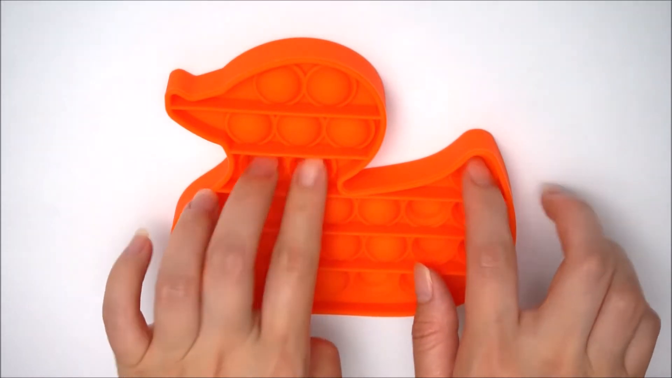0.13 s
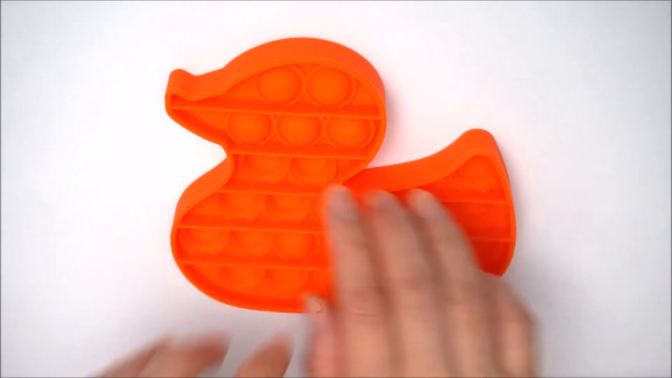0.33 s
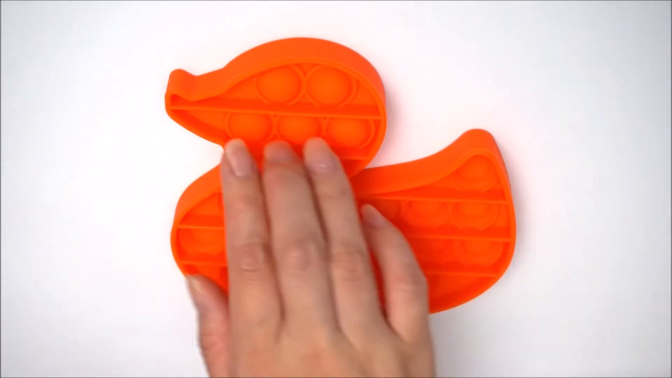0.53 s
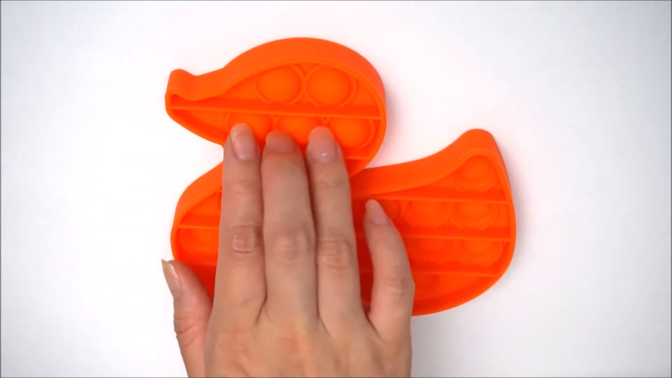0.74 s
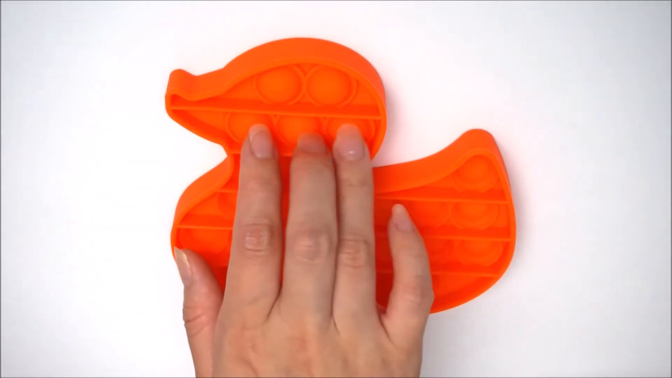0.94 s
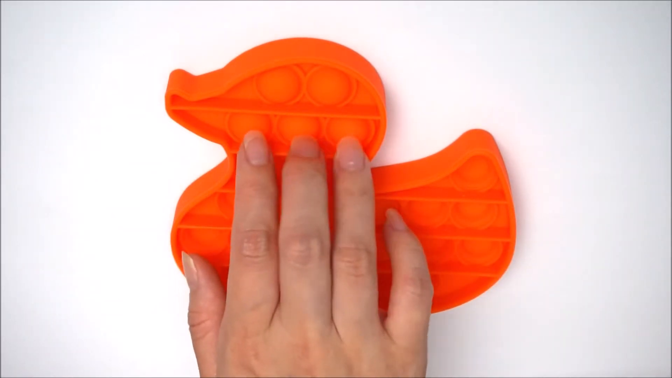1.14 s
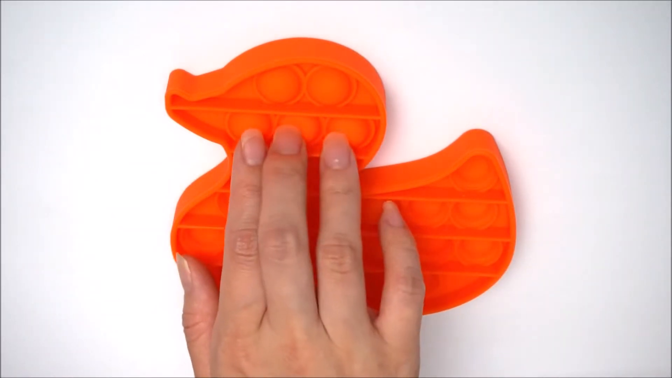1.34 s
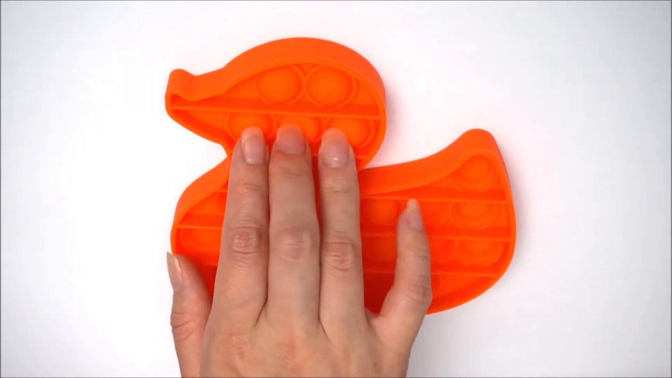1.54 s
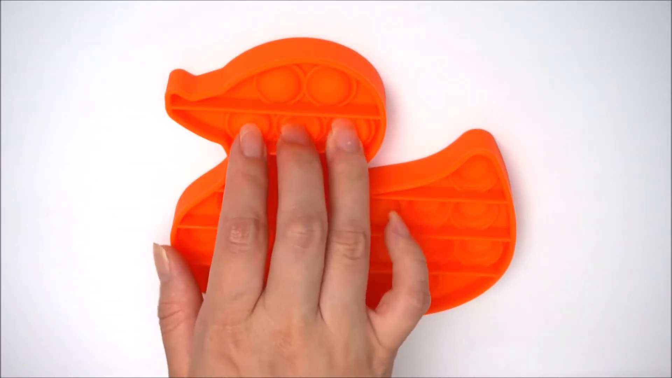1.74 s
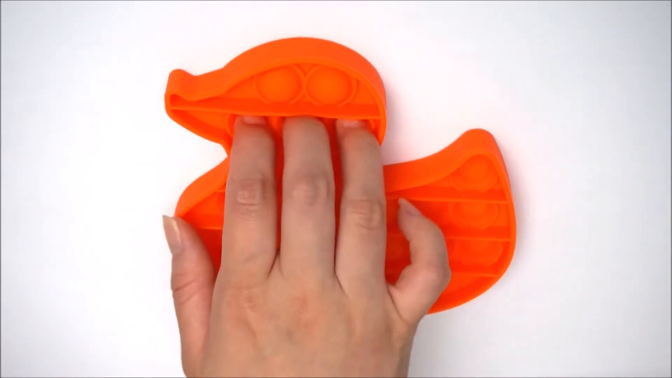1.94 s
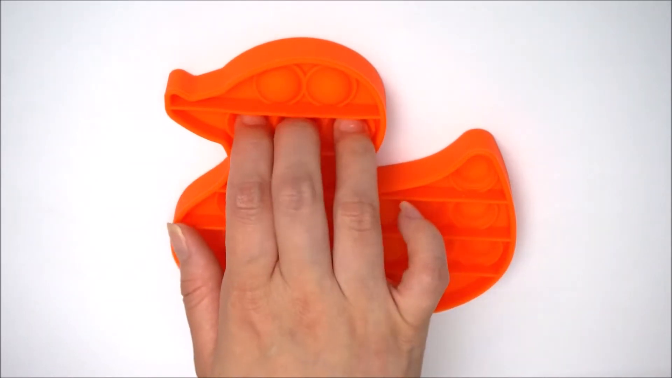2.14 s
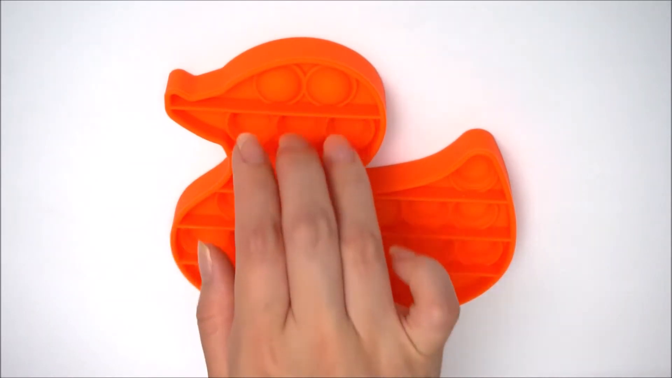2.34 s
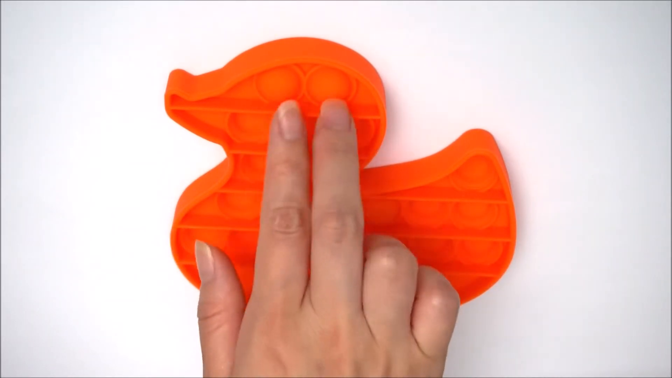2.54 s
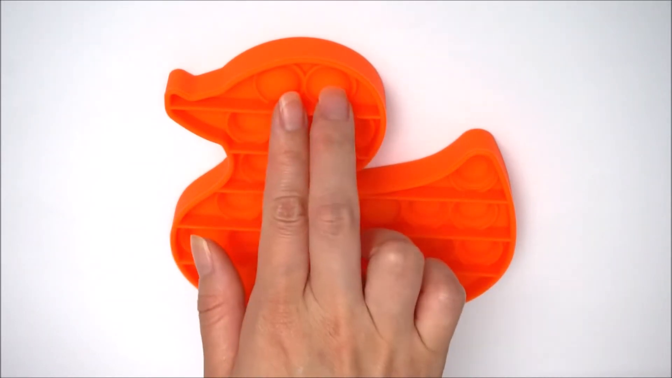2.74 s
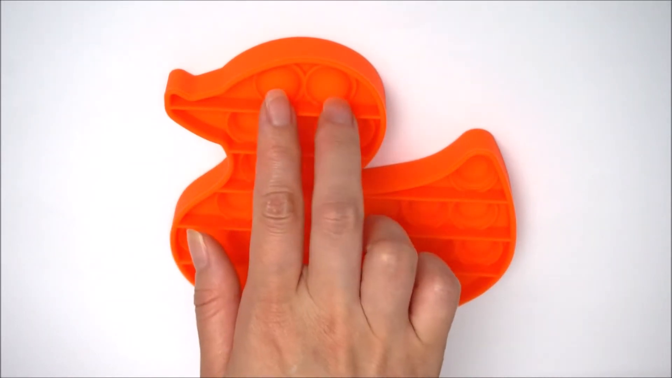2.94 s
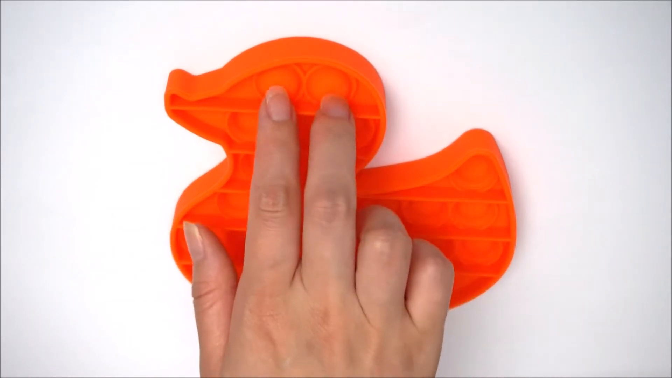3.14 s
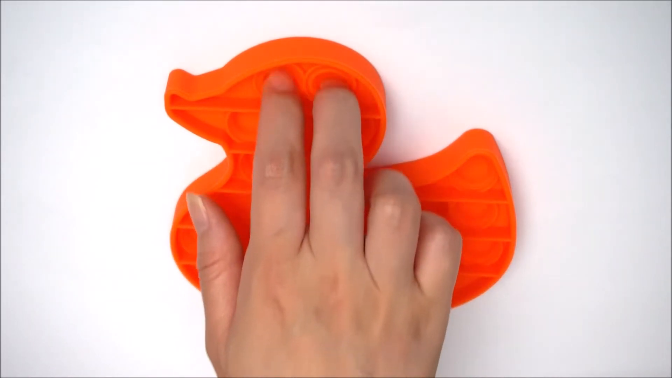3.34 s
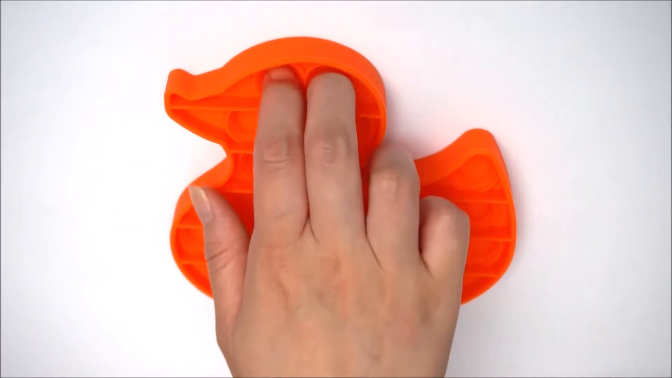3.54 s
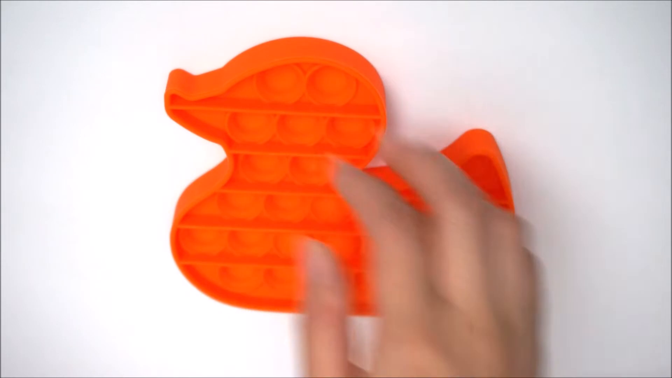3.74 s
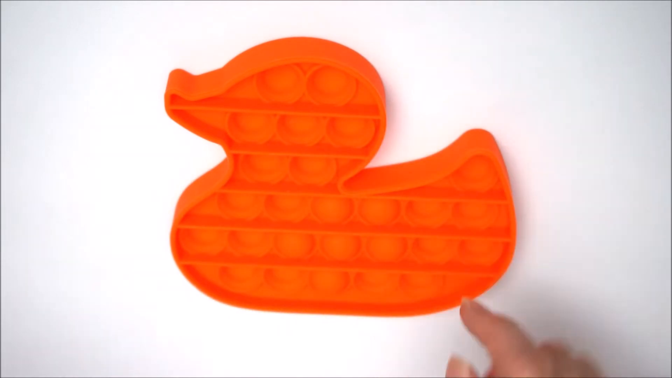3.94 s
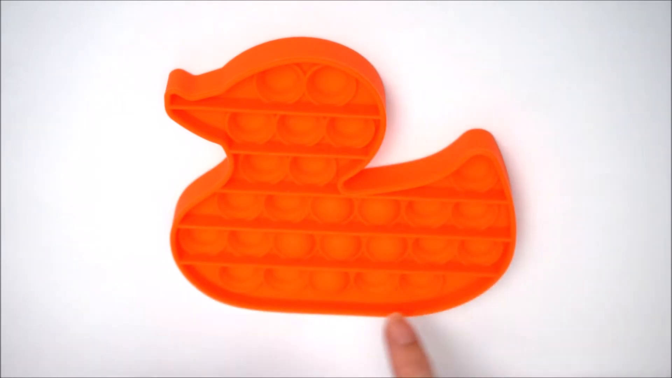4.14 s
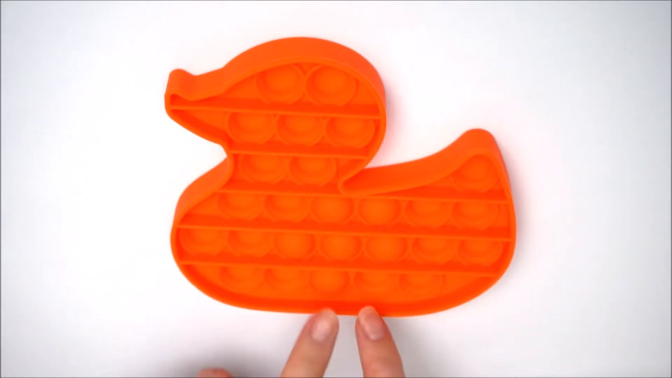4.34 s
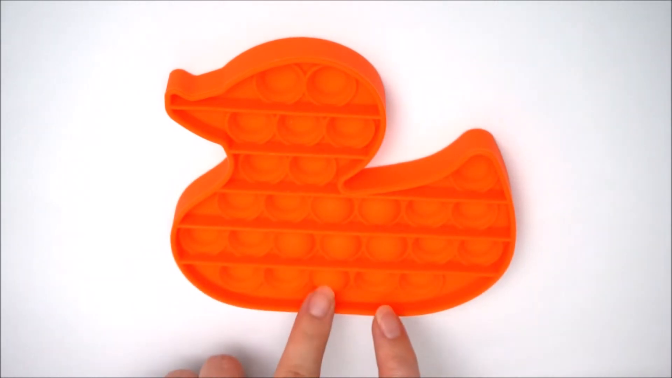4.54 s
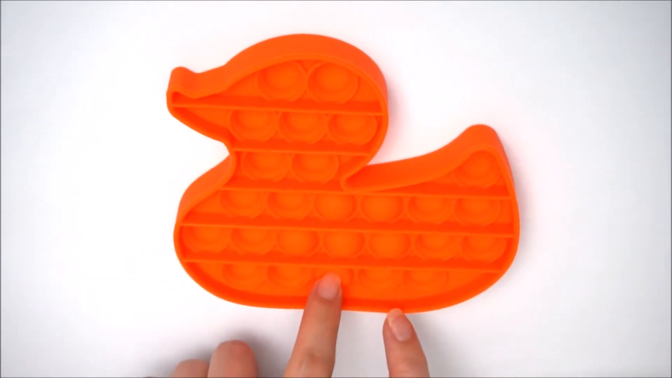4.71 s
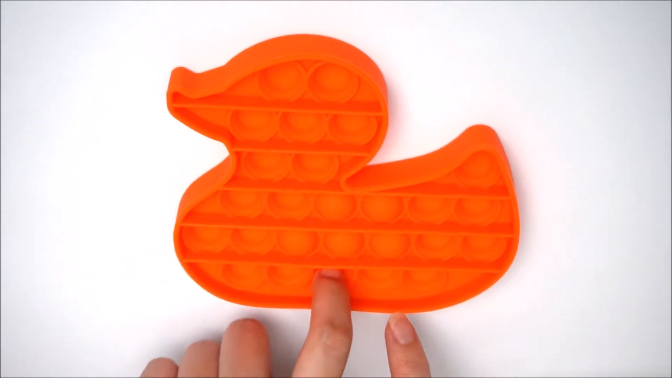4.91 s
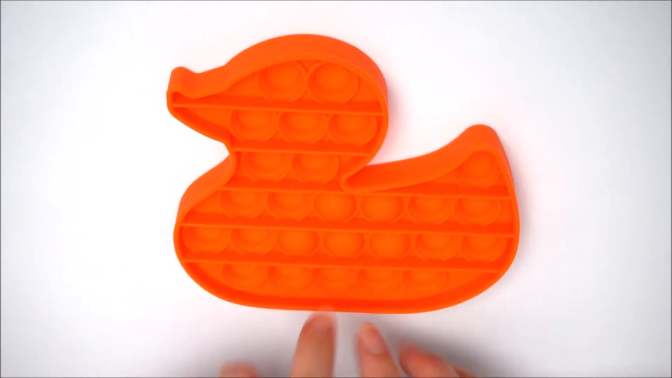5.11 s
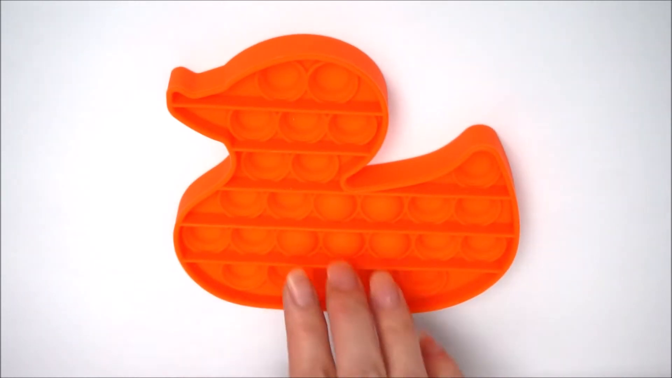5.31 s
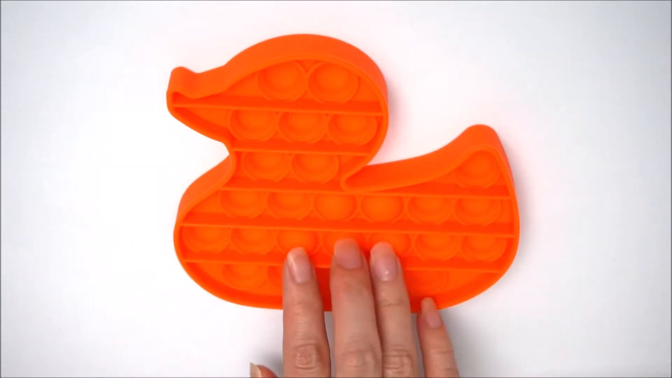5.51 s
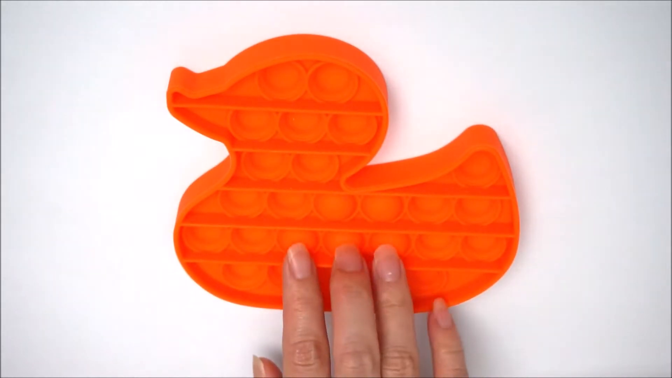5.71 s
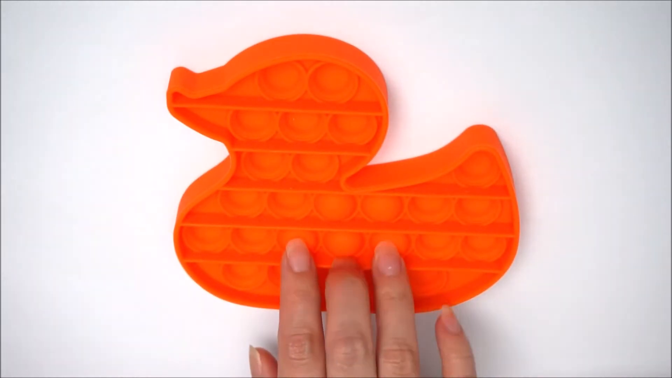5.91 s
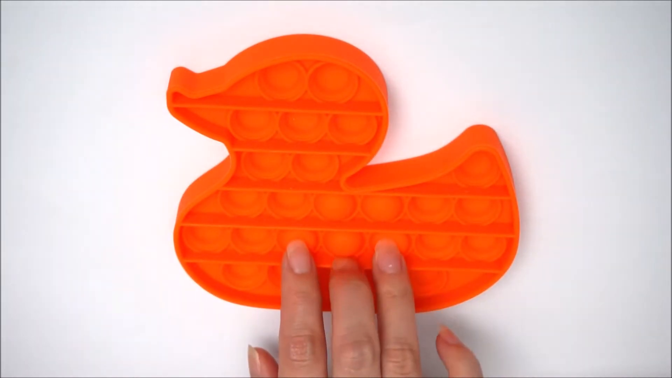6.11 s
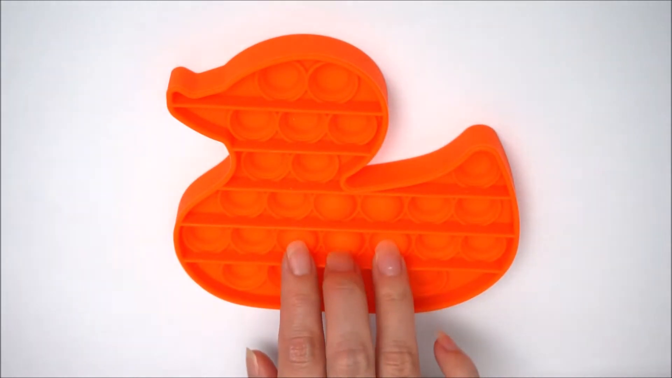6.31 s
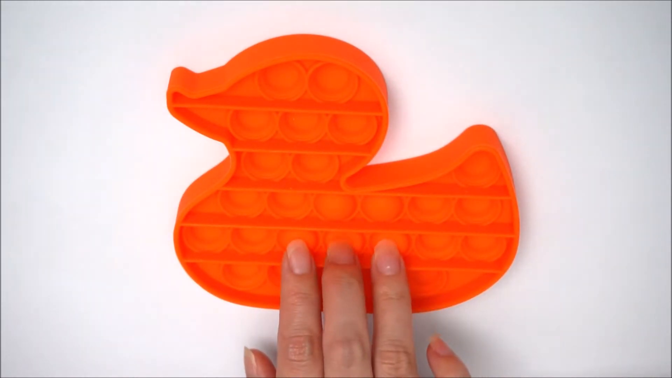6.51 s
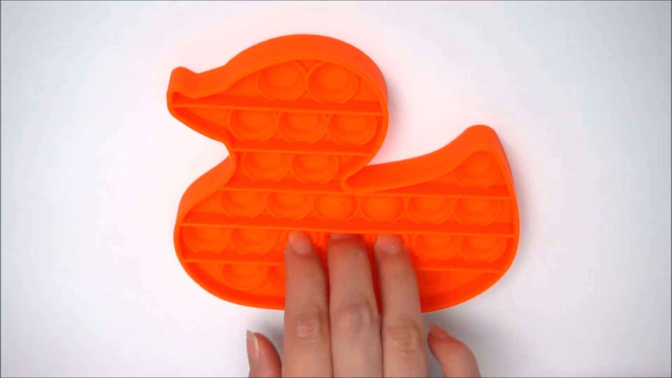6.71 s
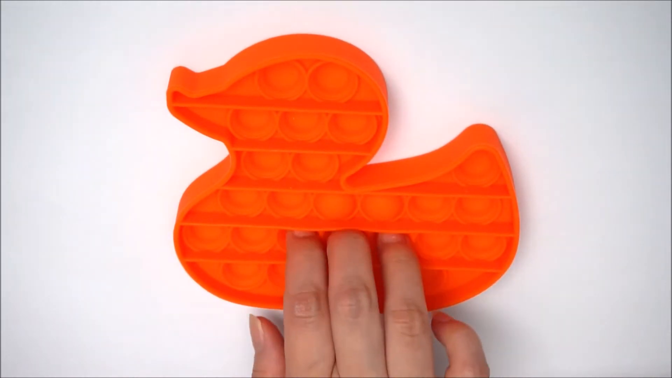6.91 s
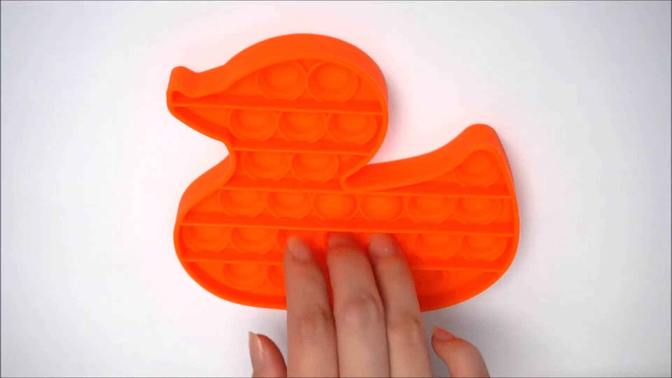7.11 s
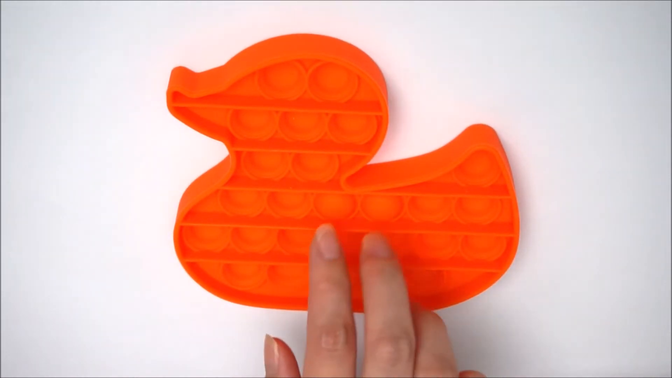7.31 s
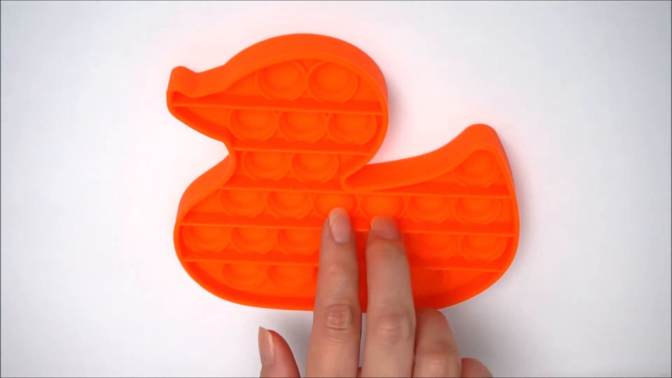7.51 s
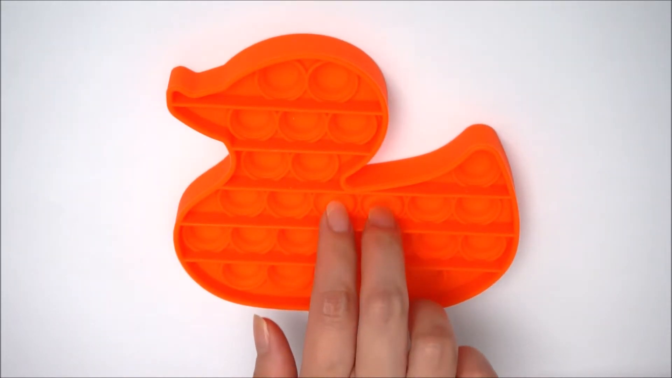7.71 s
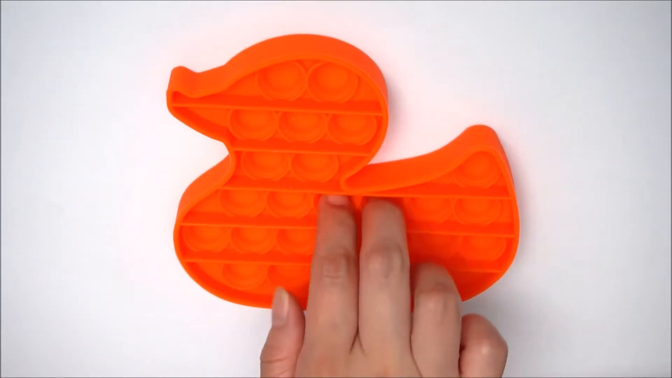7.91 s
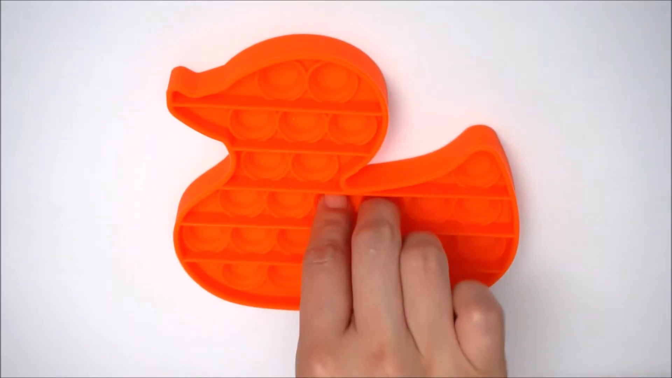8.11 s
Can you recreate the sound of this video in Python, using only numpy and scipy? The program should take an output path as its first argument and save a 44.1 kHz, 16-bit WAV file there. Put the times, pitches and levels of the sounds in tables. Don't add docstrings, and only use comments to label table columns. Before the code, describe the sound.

Clusters of soft rubbery pops from a silicone bubble toy pressed by fingers on a table, over low room hiss and faint skin rustling.

```python
import sys
import numpy as np
from scipy import signal
from scipy.fft import rfft, irfft, next_fast_len
from scipy.io import wavfile
from scipy.ndimage import uniform_filter1d

SR = 44100
rng = np.random.default_rng(int(sys.argv[2]) if len(sys.argv) > 2 else 0)


def level_to_linear(level):
    exponent = np.asarray(level, float) / 20
    return 10 ** exponent


def unload_wav(signal):
    wavfile.write(
        sys.argv[1],
        SR,
        np.round(np.clip(np.atleast_2d(signal).T, -1, 1) * 32767).astype(np.int16),
    )


N = 359415

# start in seconds, blow level in dB, dome pitch in Hz,
# time for the dome to fade by 60 dB in ms, rim level above the dome in dB.
DOME_SNAPS = [(1.8008, -29, 660.0, 12, -13), (1.8382, -16, 710, 16, 12.5), (1.8545, -14.3, 844, 23, -7),
              (1.8821, -8.5, 910, 31, -5), (1.8882, -4.5, 1070, 4.6, -11), (1.8966, -3, 933, 12.2, 2),
              (3.2913, -14, 746, 11.4, -14), (3.3545, -12, 780, 9.1, 3.5), (3.3735, -4, 910, 18.6, 1),
              (3.4138, -6.5, 1025, 18, 4), (4.7401, -20.5, 815, 11, 9.5), (4.7983, -10, 880, 9, 12.5),
              (6.6345, -10, 600, 3.6, 7.5), (6.66, -1.4, 930, 5.1, -11), (6.6945, -19.5, 730.0, 10, 8.5),
              (6.728, -11, 865, 5.4, -1), (6.756, 1.5, 1200, 3.6, -1), (6.7874, 7, 1190, 4.2, -26),
              (7.7885, -8, 920, 6.9, 6.5), (7.8038, -17.5, 810, 12.0, 2), (7.8306, 5.5, 1240, 3.2, -3.5),
              (7.8486, 5.5, 1290, 3.8, -14)]
# start in seconds, click level in dB,
# bright part against the click in dB, cell wall level in dB.
SKIN_SLAPS = [(1.8377, -38, -16, -32), (1.8537, -42, -6.5, -37), (1.881, -44, -6, -35),
              (1.8882, -41, 0, -41), (1.8937, -27.5, -18, -20.5), (3.3523, -42, -10, -28),
              (3.373, -43, -5.5, -22.5), (3.4134, -27.5, -14.5, -21), (4.7394, -46, -7, -29.5),
              (4.7971, -28, -14, -14.5), (6.6336, -48, -5, -19), (6.659, -32, -3.5, -17.5),
              (6.7263, -41, -10, -28), (6.7547, -37, -9, -12), (6.7865, -29, -16, -23),
              (7.788, -36.5, 7.5, -19), (7.8028, -46, -2, -27), (7.83, -24.5, -11.5, -18),
              (7.8478, -22, -17, -26)]


def on_log(points, hz):
    point_hz, value = np.transpose(points)
    return np.interp(np.log(np.maximum(hz, 1)), np.log(point_hz), value)


def curve(s, db):
    return level_to_linear(np.interp(np.arange(N) / SR, s, db, left=-200, right=-200))


def noise(colour):
    # pitch in Hz, left-right correlation from -1 to 1.
    likeness = [(60, 0.98), (150, 0.75), (290, 0.2), (640, -0.018), (1410, -0.33), (3100, 0.099),
                (6820, 0.14), (15000, 0.4)]
    size = next_fast_len(N)
    hz = np.fft.rfftfreq(size, 1 / SR)
    alike = np.clip(on_log(likeness, hz), -.99, .99)
    white = rfft(rng.standard_normal((2, size)))
    mid, side = white * np.sqrt([1 + alike, 1 - alike]) * level_to_linear(on_log(colour, hz))
    out = irfft(np.array([mid + side, mid - side]), size)[:, :N]
    return out / np.std(out)


def walk(rate_hz):
    hold = int(SR / rate_hz)
    steps = np.repeat(rng.standard_normal(N // hold + 1), hold)
    smooth = uniform_filter1d(uniform_filter1d(steps, hold), hold)[:N]
    return smooth / np.std(smooth)


def strokes(rows):
    t = np.arange(N) / SR
    power = np.zeros(N)
    for s, db, rise, fall in rows:
        away = np.where(t < s, (s - t) / rise, (t - s) / fall)
        power += level_to_linear(db - 20 * away) ** 2
    return np.sqrt(power)


def band(x, lo_hz, hi_hz):
    return signal.sosfilt(signal.butter(2, [lo_hz, hi_hz], "band", fs=SR, output="sos"), x)


def ring(t, hz, t60_ms):
    return np.cos(2 * np.pi * hz * t) * np.exp(-np.log(1000) * t / t60_ms * 1000)


def hiss_floor():
    # pitch in Hz, hiss strength in dB per Hz.
    hiss_colour = [(25, -17), (45, -7), (86, -3), (400, -7.5), (1270, -13), (2700, -19.5), (9300, -26),
                   (15500, -27.5)]
    # time in seconds, level in dB.
    swell = [(0.0, -52), (0.43, -59.5), (1.38, -60), (1.84, -55), (2.2, -57), (3.15, -57), (3.49, -52.5),
             (4.381, -54.5), (6.51, -56.5), (6.83, -51.5), (7.08, -57.5), (7.88, -58), (8.15, -57.5)]
    s, db = np.transpose(swell)
    hiss = noise(hiss_colour) * level_to_linear(-50.5)
    low = signal.sosfilt(signal.butter(1, 900, fs=SR, output="sos"), hiss)
    middle_db = -56.5
    swelling = curve(s, 0.58 * (db - middle_db)) * level_to_linear(1.37 * walk(9.9))
    return hiss + low * (swelling - 1)


def knock():
    t = np.arange(N) / SR
    fade_out = np.clip((.14 - t) / 0.037, 0, 1)
    return level_to_linear(-48) * ring(t, hz=355, t60_ms=960) * fade_out


def rumble():
    # loudest moment in seconds, level in dB, rise in seconds, fall in seconds.
    shoves = [
        (1.18, -46, .1, 0.5),
        (1.53, -44, 0.042, .2),
        (1.63, -43.5, .2, 0.18),
        (1.86, -53, .07, .2),
        (1.97, -40, 0.26, 0.16),
        (2.12, -51, .1, 0.062),
        (2.252, -63, .055, .05),
        (2.324, -64, 0.036, .06),
    ]
    rustles = [
        (1.95, -44, 0.098, 0.31),
    ]
    # pitch in Hz, strength in dB per Hz.
    shove_colour = [(18, -42), (30, -6), (129, -0.5), (256, -10), (338, -6), (420, -12), (1500, -25.5),
                    (2100, -70)]
    rustle_colour = [(1200, -8), (2300, -0.5), (3000, 1), (3450, 2.5), (4100, -5.5), (5100, -4), (6200, -7),
                     (12000, -20)]
    low = noise(shove_colour) * strokes(shoves) * level_to_linear(2.2 * walk(45))
    thin = noise(rustle_colour) * strokes(rustles) * level_to_linear(walk(80))
    return low + thin


def slides():
    # loudest moment in seconds, level in dB, rise in seconds, fall in seconds.
    drags = [
        (.658, -64, .23, .1),
        (.822, -64.5, .4, .2),
        (4.084, -53, 0.64, 0.35),
        (4.652, -63, .08, 0.22),
        (5.522, -68, .37, .08),
        (5.62, -74, .1, .3),
    ]
    # pitch in Hz, strength in dB per Hz.
    skin_colour = [(300, -5), (1000, -10), (3000, -4.5), (6000, -4), (10000, -0.5), (14000, -1.5),
                   (17000, -9.5)]
    grain = level_to_linear(.7 * walk(60) + 5)
    lean_right = level_to_linear(np.array([[-1.2], [1.2]]))
    return noise(skin_colour) * strokes(drags) * grain * lean_right


def table():
    blows, t = np.zeros(N), np.arange(SR // 16) / SR
    for s, db, _, t60_ms, _ in DOME_SNAPS:
        blows[int(s * SR)] = level_to_linear(db - 25) * (t60_ms / 12) ** 2.03
    table_hz = 341
    thump = ring(t, table_hz, t60_ms=26) * np.minimum(t * table_hz, 1)
    return signal.fftconvolve(blows, thump)[:N]


def cell(s):
    pressed_from_s = [0, 1.87, 3.0, 3.365, 4.5, 5.5, 6.3, 6.71, 6.745, 7.2, 7.6, 7.818, 7.95]
    # rim pitch in Hz, wall pitch in Hz.
    rim_and_wall_hz = [(1970, 2570), (1530, 2830), (1600, 2820), (1410, 2600), (1440, 2230), (3630, 2400),
                       (1380, 2380), (3080, 2000), (1630, 2490), (2000, 2400), (2350, 1420), (2010, 2600),
                       (1800, 2000)]
    return rim_and_wall_hz[np.searchsorted(pressed_from_s, s) - 1]


def walls():
    out, t = np.zeros(N), np.arange(512) / SR
    for s, _, _, db in SKIN_SLAPS:
        i = int((s + .0007) * SR)
        _, hz = cell(s)
        swelling = np.sin(np.pi / 2 * np.minimum(t * hz, 1)) ** 2
        out[i:i + len(t)] += level_to_linear(db) * ring(t, hz, t60_ms=9.9) * swelling
    return out


def ticks():
    dull, bright = np.zeros(N), np.zeros(N)
    ms = np.arange(1024) / SR * 1000
    slap_ms = 0.96
    for s, db, bright_db, _ in SKIN_SLAPS:
        i = int((s + 0.000639) * SR)
        slap = level_to_linear(db) * rng.standard_normal(len(ms)) * np.exp(-ms / slap_ms)
        dull[i:i + len(ms)] += slap
        bright[i:i + len(ms)] += level_to_linear(bright_db) * slap
    return level_to_linear(8) * band(dull, 3700, 4900) + level_to_linear(10) * band(bright, 6300, 11500)


def domes(grip_ms):
    # start in seconds, blow level in dB, dome pitch in Hz,
    # time for the dome to fade by 60 dB in ms, rim level above the dome in dB.
    touches = [
        (5.8243, -35.5, 2440, 6.9, 3.5),
        (7.42, -41, 1300, 8, 1),
        (8.051, -36.5, 900, 5.2, -1),
    ]
    out = np.zeros(N)
    t = np.arange(SR // 64) / SR
    around = np.arange(-48, 49) / SR
    grip = np.exp(-(t * 1000 / grip_ms) ** 4)
    push_cycles, rim_t60_ms = .113, 6
    for s, db, hz, t60_ms, rim_db in [*DOME_SNAPS, *touches]:
        push = np.exp(-.5 * (around * hz / push_cycles) ** 2)
        rim_hz, _ = cell(s)
        rings = grip * (ring(t, hz, t60_ms) + level_to_linear(rim_db) * ring(t, rim_hz, rim_t60_ms))
        snap = np.convolve(rings, push / push.sum())
        i = int(round(s * SR)) - len(around) // 2
        out[i:i + len(snap)] += level_to_linear(db) * snap
    small = signal.butter(2, 370, "high", fs=SR, output="sos")
    return signal.sosfiltfilt(small, out)


def near():
    # left delay in ms, right delay in ms, left gain, right gain.
    surfaces = [(2.49, 2.59, .21, .13), (3.76, 3.83, -.2, -.15), (4.49, 4.72, .17, .14),
                (5.71, 8.07, -.1, -.07), (6.44, 6.39, .16, .18), (9.12, 9.16, -.16, -.12)]
    out = np.zeros((2, SR // 100))
    for left_ms, right_ms, left, right in surfaces:
        out[0, int(left_ms * SR / 1000)] += left
        out[1, int(right_ms * SR / 1000)] += right
    shade, bend_s = .09, 2.2e-4
    late = int(bend_s * SR)
    out[0, 1], out[0, late] = 1 - shade, shade
    out[1, 0], out[1, late] = 1 + shade, -shade
    return out


def room():
    # middle of the band in Hz, time for the tail to fade by 60 dB in seconds,
    # tail level in dB, early scatter level in dB, left-right likeness from 0 to 1.
    room_bands = [(308, 0.24, -38, -28, 1), (560, 0.21, -36.5, -18, 0.85), (1045, 0.24, -39.5, -31.5, 0.93),
                  (1770, 0.3, -42, -28.5, 0.48), (2970, 0.3, -38, -27, 0.5), (5640, 0.33, -35, -32, 0),
                  (10000, 0.13, -33.5, -41, .3)]
    t = np.arange(SR // 2) / SR
    out = np.zeros((2, len(t)))
    far_wall = level_to_linear(4.5 * np.exp(-((t - 0.025) / 0.0031) ** 2))
    spread = 1 - 0.496 * np.exp(-t / 0.024)
    for hz, t60, tail_db, early_db, alike in room_bands:
        alike = np.clip(alike, 0, .99)
        grains = band(rng.standard_normal((2, len(t))), hz / np.sqrt(2), hz * np.sqrt(2))
        mid, side = grains * np.sqrt([[1 + alike], [1 - alike]])
        tail = far_wall * level_to_linear(tail_db - 60 * t / t60)
        scatter = level_to_linear(early_db - 60 * t / 0.023)
        out += (tail + scatter) * np.array([mid + spread * side, mid - spread * side])
    return out * np.clip((t - .002) / 0.00063, 0, 1)


def scene():
    background = hiss_floor() + knock() + rumble() + slides()
    slaps, cells = ticks(), walls() + table()
    close = domes(grip_ms=7) + cells + slaps
    outward = domes(grip_ms=2.8) + cells + level_to_linear(-7) * slaps
    toy = signal.fftconvolve(close[None], near(), axes=1)[:, :N]
    answer = signal.fftconvolve(outward[None], room(), axes=1)[:, :N]
    return background + toy + answer


def band_limit(x):
    return signal.sosfilt(signal.butter(12, 16800, fs=SR, output="sos"), x)


def record(dry):
    top = signal.ellip(10, .2, 60, 15850, fs=SR, output="sos")
    full = np.clip(dry, -.99, .99)
    return band_limit(signal.sosfilt(top, full))


dry = scene()
out = record(dry)
unload_wav(out)
```